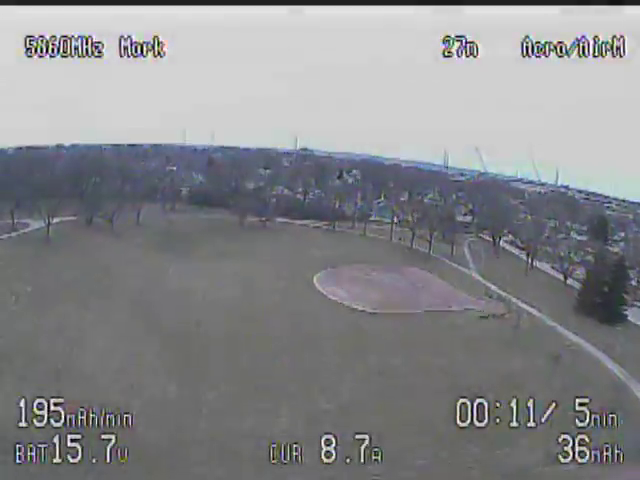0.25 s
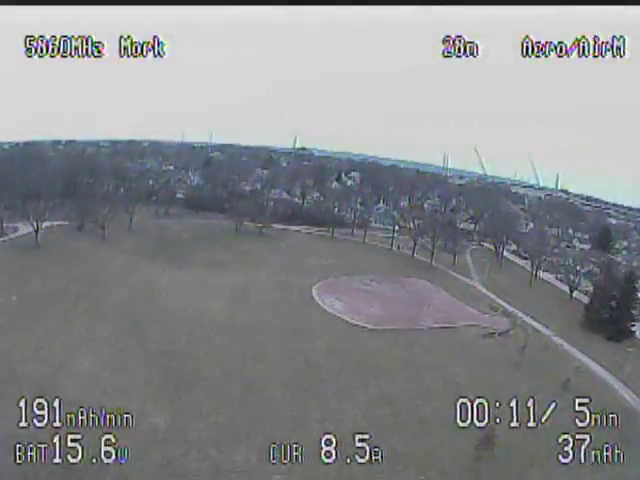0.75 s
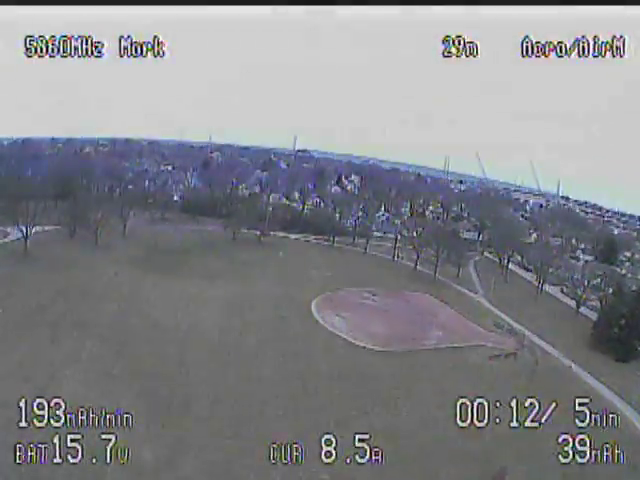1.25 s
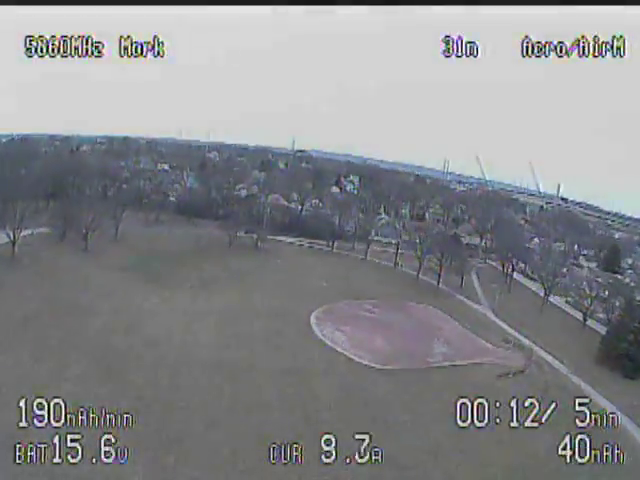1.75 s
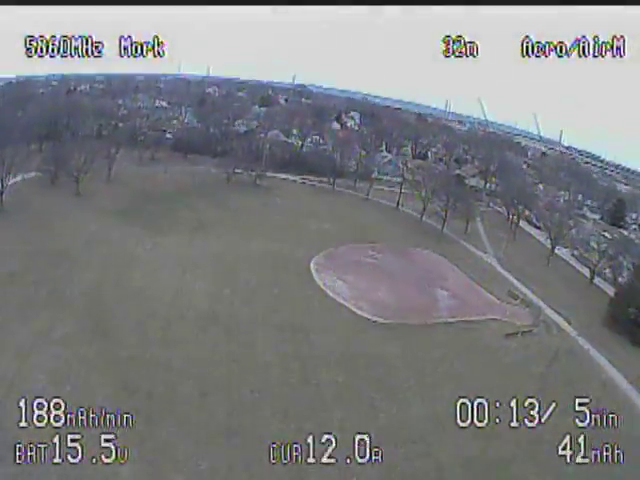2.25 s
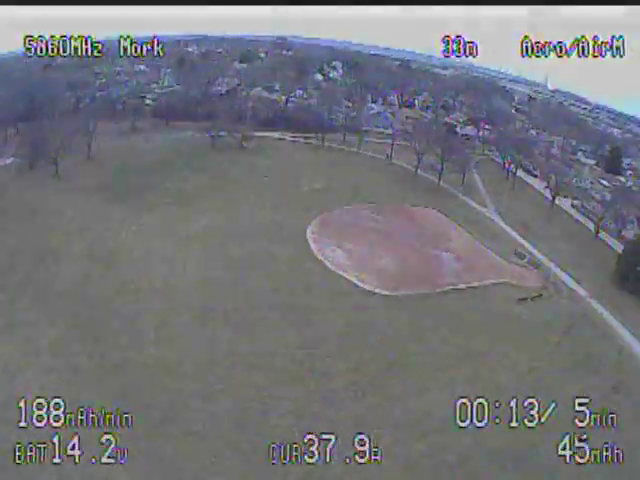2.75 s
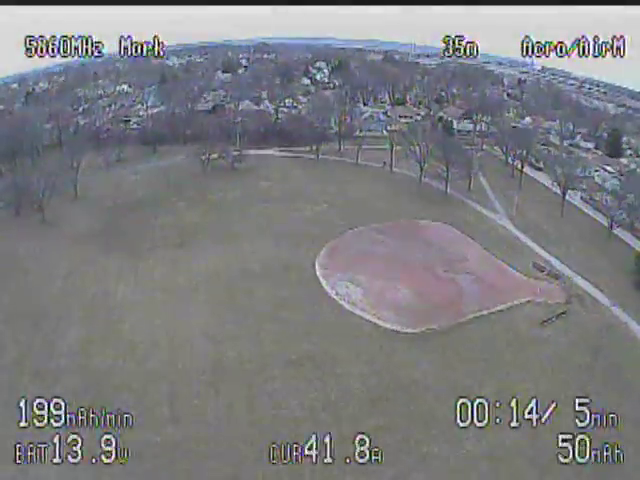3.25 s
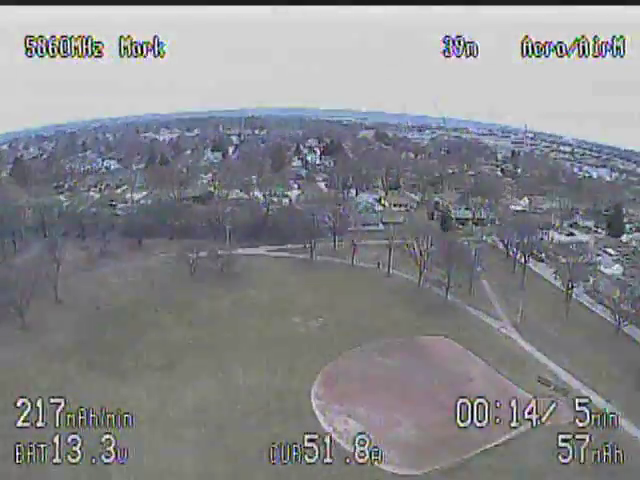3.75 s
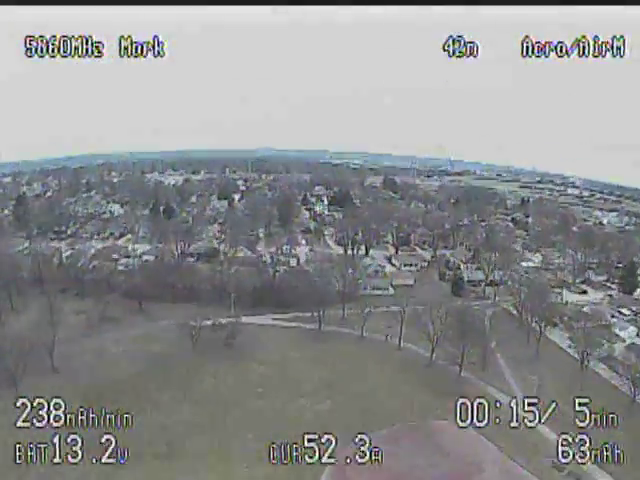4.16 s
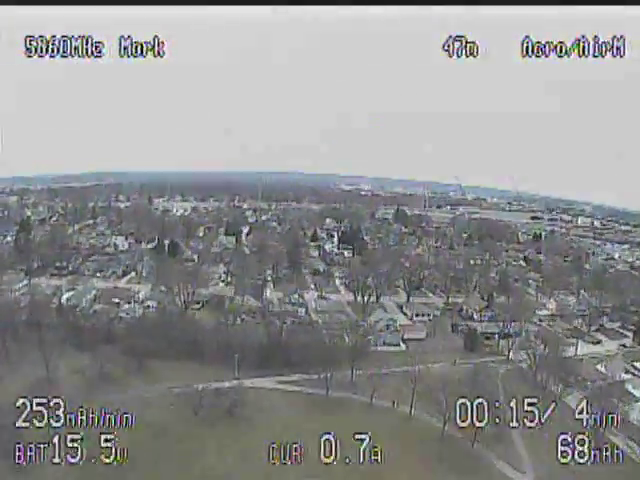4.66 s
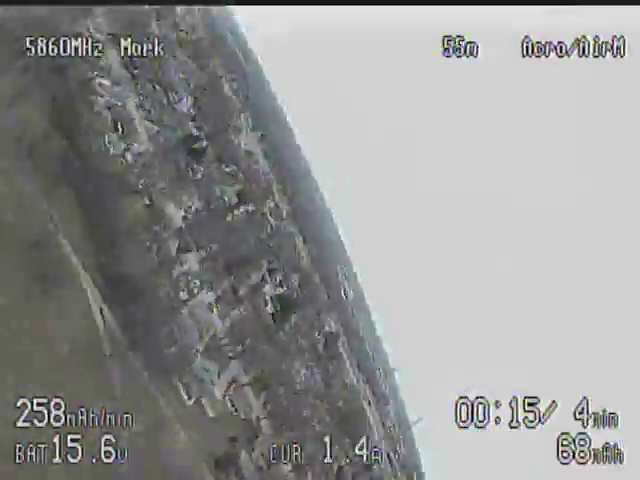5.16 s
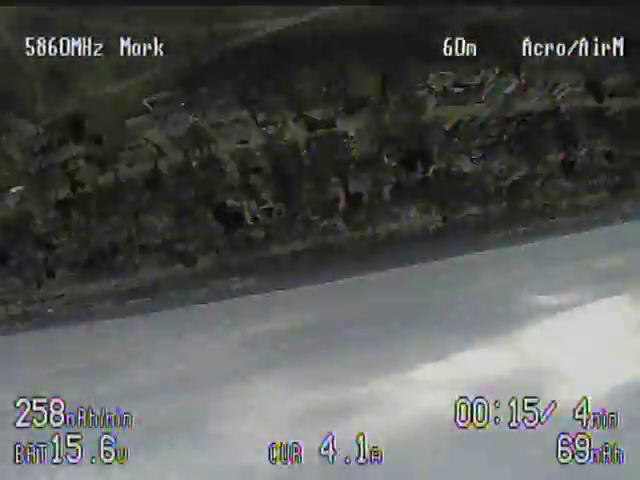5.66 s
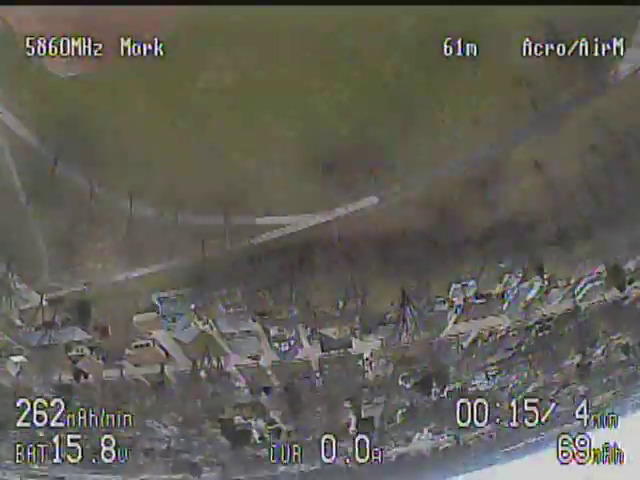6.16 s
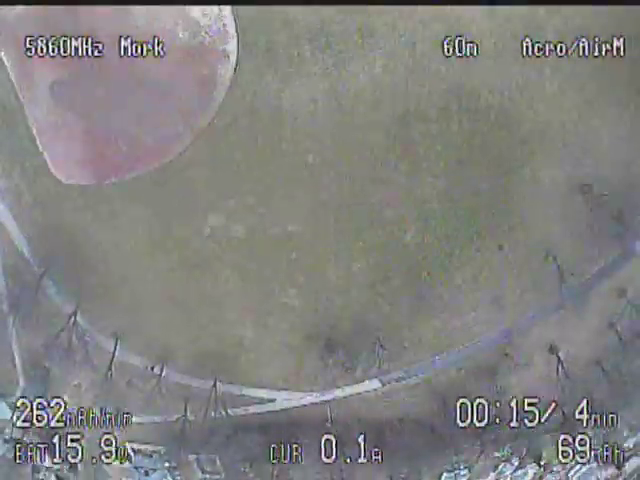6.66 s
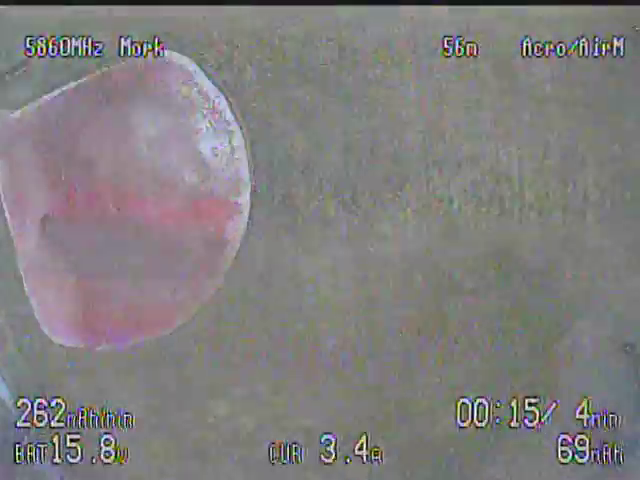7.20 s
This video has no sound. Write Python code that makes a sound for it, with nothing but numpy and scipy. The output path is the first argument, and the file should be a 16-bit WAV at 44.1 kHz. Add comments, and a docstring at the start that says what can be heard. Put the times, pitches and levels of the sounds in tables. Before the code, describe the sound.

A tiny microphone aboard a racing drone gives a close, dry, narrow and heavily clipped sound. From 0 to 2 seconds the propellers hold a buzzing mid-low whine, almost steady, rising slightly around 1.5, with light wash and random soft bumps. At 2.1 the pitch steps up, then at 2.5 it leaps to a much higher, rough whine in thicker turbulent rush, rising once more at 3.3 and straining unevenly until 4.6. Around 4.7 the throttle cuts: the pitch plunges and blurs within a fraction of a second. Tearing wind takes over, with choking gusts and brief gaps until about 5.3. From 5.4 to 6.5 the wind eases somewhat, exposing low blade flutter, a faint wavering hum until about 5.8 and a short motor blip near 5.75. Two quick gusts hit around 6.65; distorted wind grows to 7.4, with small motor blips near 6.8 and 7.2.

```python
"""A racing quadcopter heard through its own tiny microphone: it cruises, then climbs at full throttle.
The whine is blade-passing suction and the rush is turbulent wash; single eddies bump the microphone.
Then the throttle is cut for a flip: the whine falls and open slipstream and gusts take over; a far
propeller hums faintly while the craft is inverted. Throughout, the capsule passes mainly suction, and a
narrow, hard-clipping recorder turns the overload into a buzzing whine and a tearing rush of wind."""
import sys
import numpy as np
from scipy import signal
from scipy.fft import rfft, irfft
from scipy.io import wavfile
from scipy.ndimage import uniform_filter1d

SR = 44100
rng = np.random.default_rng(int(sys.argv[2]) if len(sys.argv) > 2 else 0)


def to_wav(s):
    """Save 16-bit WAV."""
    ch = np.atleast_2d(s).T  # columns
    pcm = np.round(np.clip(ch, -1, 1) * 32767)  # PCM
    wavfile.write(sys.argv[1], SR, pcm.astype(np.int16))


N = 327663
TIME = np.arange(N) / SR


def amp(db):
    """Logarithmic level: decibels to an amplitude gain."""
    return 10 ** (np.asarray(db) / 20)


def curves(rows):
    """Linear interpolation: each column of a table, joined by straight lines in time."""
    seconds, *columns = np.transpose(rows)
    return [np.interp(TIME, seconds, column) for column in columns]


def ramp(middle_s, length_s):
    """Linear crossfade: a straight rise from 0 to 1 centred on the given moment."""
    return np.clip((TIME - middle_s) / length_s + .5, 0, 1)


def noise(points):
    """Spectral shaping: white noise weighted to the given spectrum, scaled to rms 1."""
    hz, db = np.transpose(points)
    bins_hz = np.fft.rfftfreq(N, 1 / SR)
    shape = amp(np.interp(np.log(bins_hz + 1), np.log(hz), db))
    x = irfft(rfft(rng.standard_normal(N)) * shape, N)
    return x / x.std()


def wander(rate_hz):
    """Band-limited random modulation of rms 1, its amplitude spectrum halved at the given rate."""
    rolloff = 1 + (np.fft.rfftfreq(N, 1 / SR) / rate_hz) ** 4
    x = irfft(rfft(rng.standard_normal(N)) / rolloff, N)
    return x / x.std()


def oscillator_phase(hz):
    """Phase accumulation: the running integral of a varying frequency, in radians."""
    return 2 * np.pi * np.cumsum(hz) / SR


START_HZ = 415  # blade passes a second of the nearest propeller, cruising
# Speeds the propeller settles on: cruise, three steps up, easing off, the cut, then windmilling.
# Each row: start in seconds, new blade rate in Hz, lag in seconds.
ROTOR_SPEEDS = [(0.15, 409.5, .22), (1.45, 424.3, .25), (2.11, 465.7, .07), (2.49, 652, 0.063),
                (3.3, 714.3, .03), (4.595, 640, .025), (4.675, 185, .038), (5.22, 101.9, .085),
                (5.8, 121.5, .04), (6.32, 112, .04)]


def blade_rate():
    """Rotor inertia: a critically damped response eases the blade rate into each new speed; blips add."""
    hz, before = START_HZ + blips(), START_HZ
    for start_s, new_hz, lag_s in ROTOR_SPEEDS:
        u = np.maximum(TIME - start_s, 0) / lag_s
        hz = hz + (new_hz - before) * (1 - (1 + u) * np.exp(-u))
        before = new_hz
    return hz


def propeller(hz, jitter=0.0026, hunting=.004, hunting_hz=9, braking_jitter=.05, sharpness=0.37,
              flutter_db=2.06, swell_db=0.8, throb_db=0.8, throb_hz=26,
              shake=0.28, rattle=0.35, shake_jitter=.03, full_hz=715):
    """Blade-passing tone: each blade sweeps a suction dip past, sharper and more uneven with speed."""
    speed = hz / full_hz
    strain = speed ** 4
    # the speed hunts near full throttle; in hard braking the four motors slow at different rates,
    # which blurs the falling pitch
    slope_per_s = uniform_filter1d(np.gradient(speed), 1500) * SR
    braking = np.clip(-slope_per_s / 3, 0, 1)
    drift = jitter * wander(25)
    drift += hunting * strain * wander(hunting_hz)
    drift += braking_jitter * braking * wander(120)
    phase = oscillator_phase(hz * (1 + drift))
    # seven harmonics, each weaker than the last by the falloff
    falloff = np.clip(sharpness * np.tanh(3.2 * speed), 0, .8)
    dips = -sum(falloff ** k * np.cos((k + 1) * phase) for k in range(7))
    # uneven inflow changes the load from pass to pass and in slower swells; the rotors beat under strain
    beat = np.sin(oscillator_phase(throb_hz * (1 + .3 * wander(8))))
    load_db = flutter_db * speed * wander(230) + swell_db * wander(58) + throb_db * strain * beat
    # near full speed the two-bladed rotors rock the frame at the shaft rate, half the blade rate
    shaft = strain * np.cos(oscillator_phase(hz / 2 * (1 + shake_jitter * wander(36))))
    return dips * amp(load_db) * (1 + shake * shaft) - rattle * shaft


# the blade wave gives way to wash and ram pressure as the blade rate climbs
CLIMB_FROM_HZ, CLIMB_SPAN_HZ = 412, 128
CRUISE_BLADE_DB, CLIMB_BLADE_DB = -1.7, -11
CRUISE_WASH_DB, WASH_DB_PER_HZ = -11.5, .008
CRUISE_RAM, RAM_PER_HZ = .1, .0006  # steady pressure as a share of the blade wave
SURGE_DB, SURGE_HZ_PER_S, SURGE_SPREAD_S = 2.7, 130, 0.3  # speeding up stirs extra wash


def under_power(hz):
    """Speed scaling: blade wave dB, turbulence dB and ram pressure all follow the propeller's speed."""
    extra_hz = np.maximum(hz - CLIMB_FROM_HZ, 0)
    climb = 1 - np.exp(-extra_hz / CLIMB_SPAN_HZ)
    speeding_up = uniform_filter1d(np.gradient(hz) * SR, round(SURGE_SPREAD_S * SR))
    surge = np.clip(speeding_up * (1 - climb) / SURGE_HZ_PER_S, 0, 1)
    blade_db = CRUISE_BLADE_DB + (CLIMB_BLADE_DB - CRUISE_BLADE_DB) * climb
    air_db = CRUISE_WASH_DB + WASH_DB_PER_HZ * extra_hz + SURGE_DB * surge
    return np.array([blade_db, air_db, CRUISE_RAM + RAM_PER_HZ * extra_hz])


# Spectra of turbulence in the propeller wash and in free flight.
# Each row: frequency in Hz, relative level in dB per Hz.
WASH_SPECTRUM = [(15, 0.5), (40, 1), (70, -5.5), (140, -5.5), (300, -6.5), (600, -12.5), (1200, -20.5),
                 (2400, -28.5), (4000, -28), (6000, -50.5)]
SLIPSTREAM_SPECTRUM = [(15, 4.5), (30, 5), (60, -1), (140, 3.5), (300, 0.85), (600, -8), (1100, -15.5),
                       (2400, -47), (4000, -31), (6000, -23)]


def turbulence(cut_s=4.715, onset_s=0.069, wash_lumps_db=1.0, eddy_hz=70):
    """Turbulent pressure noise: lumpy propeller wash until the throttle cut, then steadier slipstream."""
    free = ramp(cut_s, onset_s)
    wash = noise(WASH_SPECTRUM) * amp(wash_lumps_db * wander(eddy_hz))
    return (1 - free) * wash + free * noise(SLIPSTREAM_SPECTRUM)


def buffets(per_s=14, size=0.42, length_s=.007, until_s=5.1):
    """Vortex impact: single eddies shed by the blades bump the microphone at random moments."""
    happens = (rng.random(N) < per_s / SR) & (TIME < until_s)
    hits = happens * rng.standard_normal(N)
    return size * signal.oaconvolve(hits, np.hanning(round(length_s * SR)))[:N]


# Brief motor blips that steer the craft.
# Each row: start in seconds, rise in seconds, peak change of blade rate in Hz.
STEERING_BLIPS = [(4.33, .05, -14), (4.85, .11, 70), (5.745, .075, 85), (6.71, .08, 38), (7.06, .13, 27)]


def blips(steepness=3.0):
    """Transient drive: the change of blade rate in Hz swells quickly to a peak and dies away."""
    hz = np.zeros(N)
    for start_s, rise_s, extra_hz in STEERING_BLIPS:
        u = np.maximum(TIME - start_s, 0) / rise_s
        hz += extra_hz * (u * np.exp(1 - u)) ** steepness
    return hz


# throttle cut: the blade wave is weak, except while the craft hangs upside down
CUT_S, CUT_FADE_S, IDLE_BLADE_DB = 4.70, 0.04, -5
INVERTED_S, UPRIGHT_S, TURN_IN_S, TURN_OUT_S, INVERTED_BLADE_DB = 5.4, 6.48, .17, .08, 5.5
BLIP_DB_PER_HZ, BLIP_RAM_PER_HZ = 0.0665, .007
# Airflow through the flip and the dive.
# Each row: time in seconds, turbulence in dB, steady pressure as a share of the blade wave.
FLIP_AIRFLOW = [(4.74, 2.5, 0.88), (4.85, 1, -0.39), (5.14, 5, -.6), (5.3, 2.5, 0.029), (5.7, -1.5, -0.52),
                (6.05, -1.7, -0.21), (6.55, 2.5, -0.12), (7.43, 5.5, -0.15)]


def coasting():
    """Flow loading without drive: attitude, airflow and blips set blade dB, turbulence dB and ram."""
    inverted = ramp(INVERTED_S, TURN_IN_S) - ramp(UPRIGHT_S, TURN_OUT_S)
    air_db, ram = curves(FLIP_AIRFLOW)
    extra_hz = blips()
    blade_db = IDLE_BLADE_DB + (INVERTED_BLADE_DB - IDLE_BLADE_DB) * inverted
    blade_db = blade_db + BLIP_DB_PER_HZ * extra_hz
    return np.array([blade_db, air_db, ram + BLIP_RAM_PER_HZ * extra_hz])


# Gusts that press the diaphragm flat and choke the sound.
# Each row: middle in seconds, length in seconds, peak pressure in dB.
CHOKING_GUSTS = [(4.794, 0.022, 6), (4.917, 0.013, 9), (4.995, 0.021, 26.5), (5.037, 0.013, 34.5),
                 (5.092, 0.018, 6), (5.218, 0.024, 13), (5.332, 0.029, 1), (6.644, 0.013, 14),
                 (6.682, .016, -4)]


def gusts():
    """Stagnation pressure: each gust is a raised-cosine pulse of positive pressure."""
    pressure = np.zeros(N)
    for middle_s, length_s, peak_db in CHOKING_GUSTS:
        position = np.clip((TIME - middle_s) / length_s, -.5, .5)
        pressure += amp(peak_db) * np.cos(np.pi * position) ** 2
    return pressure


def far_propeller(jitter=.025, hz=297, level_db=-2.5, start_s=5.42, end_s=5.83, fade_s=.17):
    """Frequency-modulated tone: a faint hum from across the frame, holding the attitude in the flip."""
    level = amp(level_db) * (ramp(start_s, fade_s) - ramp(end_s, fade_s))
    return level * np.cos(oscillator_phase(hz * (1 + jitter * wander(30))))


def scene():
    """Superposition: all pressures add at the microphone on the frame."""
    hz, cut = blade_rate(), ramp(CUT_S, CUT_FADE_S)
    blade_db, air_db, ram = (1 - cut) * under_power(hz) + cut * coasting()
    blades = amp(blade_db) * (propeller(hz) + ram)
    air = amp(air_db) * turbulence()
    pressure = blades + air + buffets() + gusts() + far_propeller()
    return pressure[None]


def lowpass(x, hz, order):
    """Butterworth response: maximally flat below the corner."""
    return signal.sosfilt(signal.butter(order, hz, fs=SR, output="sos"), x)


def capsule(pressure, leak=0.048, port_hz=3200):
    """Asymmetric saturation: the diaphragm bottoms out under push and follows suction to its limit."""
    travel, knee = 2.4, .3
    suction = knee * np.logaddexp(0, -pressure / knee)  # soft half-wave rectifier
    return lowpass(leak * pressure - travel * np.tanh(suction / travel), port_hz, order=1)


def coupling(x, corner_hz=27, damping=0.57):
    """Second-order high-pass of the preamplifier: the baseline sags and overshoots after each push."""
    w = 2 * np.pi * corner_hz
    b, a = signal.bilinear([1, 0, 0], [1, 2 * damping * w, w * w], SR)
    return signal.lfilter(b, a, x)


RAIL, SAMPLING_HZ, EDGE_HZ = .70, 8000, 15900  # clip level, converter rate, final low-pass edge


def record(dry, hiss_db=-48, offset=0.0032):
    """Sampling and clipping: the converter clips, and crests between its samples clip again."""
    x = coupling(capsule(dry[0])) + offset + amp(hiss_db) * rng.standard_normal(N)
    samples = np.clip(signal.resample_poly(x, SAMPLING_HZ, SR), -RAIL, RAIL)
    # rebuild the wave up to 0.98 of the converter's half rate; 441 is the upsampling factor
    smoothing = signal.firwin(32 * 441 + 1, .98 / 441, window=("kaiser", 9))
    rebuilt = signal.resample_poly(samples, SR, SAMPLING_HZ, window=smoothing)[:N]
    clipped = np.clip(rebuilt, -RAIL, RAIL)
    edge = signal.firwin(511, EDGE_HZ, window=("kaiser", 9), fs=SR)
    return signal.oaconvolve(clipped, edge, "same")[None]


dry = scene()
out = record(dry)
to_wav(out)
```